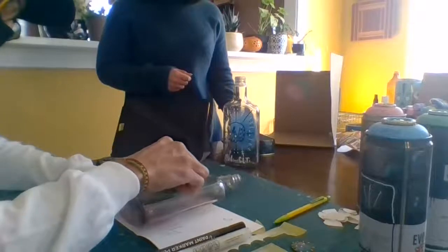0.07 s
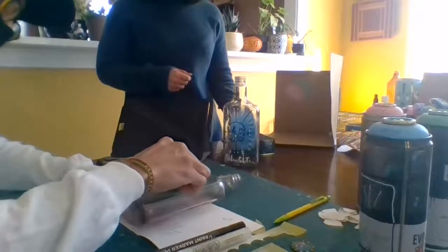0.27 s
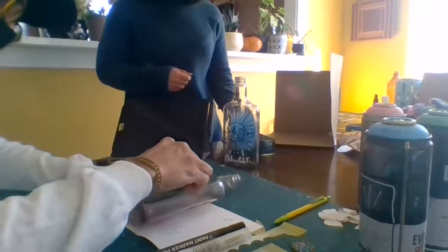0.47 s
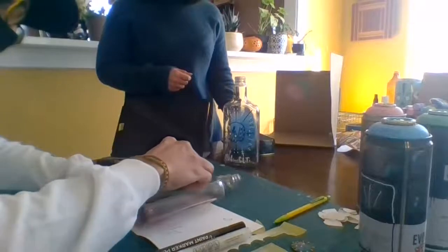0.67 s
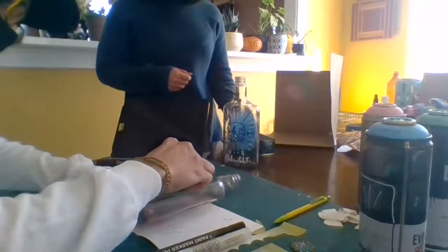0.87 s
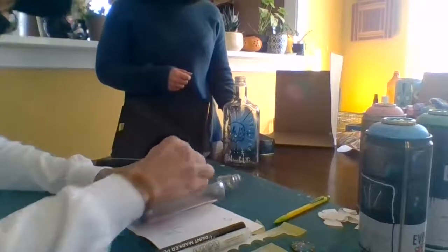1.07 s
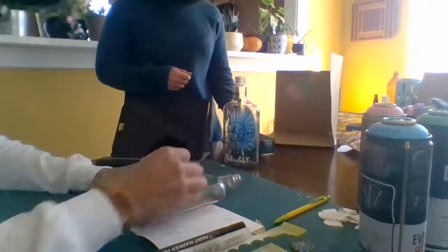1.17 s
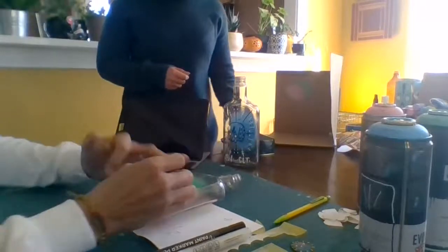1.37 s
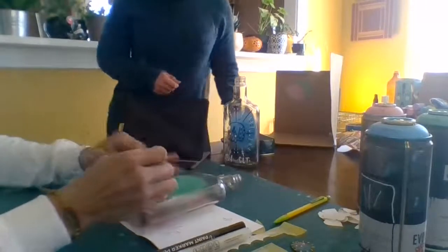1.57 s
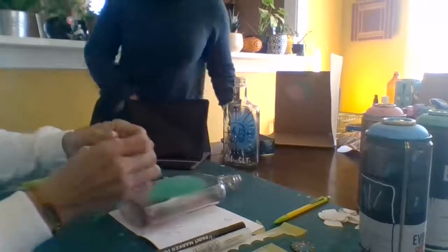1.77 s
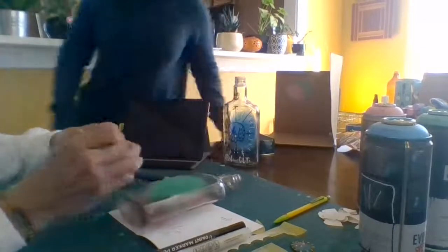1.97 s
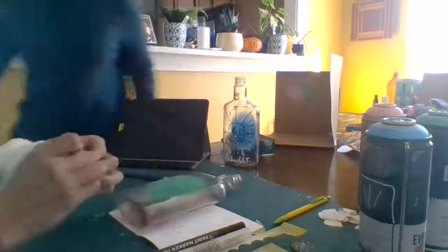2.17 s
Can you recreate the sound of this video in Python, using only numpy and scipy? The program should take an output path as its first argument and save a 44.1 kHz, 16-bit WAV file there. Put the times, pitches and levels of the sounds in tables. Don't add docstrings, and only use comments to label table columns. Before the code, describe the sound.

A razor blade scrapes a glass bottle twice, one gritty stroke then a sharper flick with a brief glassy ring, after soft table bumps and two light taps, close in a small room with faint hiss.

```python
import sys
import numpy as np
from scipy import signal
from scipy.fft import rfft, irfft
from scipy.io import wavfile
from scipy.ndimage import uniform_filter1d

SR = 44100
rng = np.random.default_rng(int(sys.argv[2]) if len(sys.argv) > 2 else 0)


def inscribe(sig):
    pcm = np.round(np.clip(np.atleast_2d(sig).T, -1, 1) * 32767)
    wavfile.write(sys.argv[1], SR, pcm.astype(np.int16))


def undo_db(level):
    steps = np.asarray(level, float) / 20
    return 10 ** steps


N = 98298


def level(x, db):
    return x * undo_db(db) / np.sqrt(np.mean(x ** 2))


def curve(rows):
    return undo_db(np.interp(np.arange(N) / SR, *np.array(rows).T, left=-200, right=-200))


def colour(x, points):
    f = np.arange(N // 2 + 1) * SR / N + 1
    hz, db = np.array(points).T
    gain_db = np.interp(np.log(f), np.log(hz), db, left=-90, right=-90)
    return irfft(rfft(x) * undo_db(gain_db), N)


def butter(x, order, hz, kind):
    return signal.sosfilt(signal.butter(order, hz, kind, fs=SR, output="sos"), x)


def mode(x, hz, t60):
    pole = np.exp(2j * np.pi * hz / SR - np.log(1000) / (t60 * SR))
    return signal.lfilter([1], [1, -pole], x).imag


def walk(rate):
    k = int(SR / rate)
    steps = np.repeat(rng.standard_normal(N // k + 1), k)
    return 1.5 * uniform_filter1d(uniform_filter1d(steps, k), k)[:N]


# time in seconds [s], level [dB].
FIRST_STROKE = [
    (1.432, -67),
    (1.448, -51),
    (1.482, -39.5),
    (1.512, -43),
    (1.52, -35.5),
    (1.545, -38.5),
    (1.57, -33.5),
    (1.582, -55),
    (1.61, -54),
]
# time in seconds [s], level [dB].
SECOND_STROKE = [
    (1.794, -35.5),
    (1.798, -33.5),
    (1.808, -31.5),
    (1.817, -29),
    (1.824, -32),
    (1.833, -32),
    (1.86, -80),
]
# pitch [Hz], t60 [s], first stroke level [dB],
# place along the stroke where it rings best [0-1], second stroke level [dB].
GLASS_MODES = [(2024, 0.22, -4.5, 0.52, -28), (2126, 0.087, -8, 0.42, -22), (3388, 0.039, -11, 0.28, -9),
               (3640, 0.16, -7.5, 0.78, -24), (3520, 0.087, -9.5, 0.77, -12.5), (4590, 0.21, -1, 0.09, -16),
               (4580, 0.11, -33, 0.1, -10), (4790, 0.059, -4.5, 0.91, -11), (5525, 0.076, -11, 0.42, -6.5),
               (5780, 0.055, -7, 0.8, -32), (6210, 0.11, -3.5, 0.52, -6.5), (6370, 0.058, -3.5, 0.1, -7.5)]
# pitch [Hz], t60 [s], first stroke level [dB],
# place along the stroke where it rings best [0-1], second stroke level [dB].
STEEL_MODES = [(8200, 0.02, -6, 0.5, -21), (8400, 0.14, -8, 0, -15), (8720, 0.027, 0.5, 0.29, -17),
               (8967, 0.066, -1.5, 0.8, 2), (9420, 0.18, 0.5, 0.15, -7), (9290, 0.053, 0, 0.33, -10),
               (9890, 0.088, 0, 0.24, -11.5), (10250, 0.049, -28, 0.1, -28), (10800, 0.042, -8.5, 0.35, -9),
               (10980, 0.06, -11, 0.6, -11), (11700, 0.018, -18, 0.2, -21)]
# frequency [Hz], density [dB per Hz].
PAINT_RASP = [(300, -22), (700, -31.5), (1300, -12.5), (2500, -15), (4500, -7.5), (7000, -7), (9500, -5),
              (12000, -14)]


def slip_grains(press):
    grains_per_s, spread_db = 7000, 0.5
    happens, size, sign = rng.random((3, N))
    heights = undo_db(np.minimum(-spread_db * np.log(size), 9))
    slips = (happens < grains_per_s / SR) * heights * np.sign(sign - .5)
    return level(slips, 0) * curve(press) * undo_db(1.9 * walk(150))


def stroke(press, mode_db, places, ring, focus_db, flutter_db, rasp_db, rasp_tilt_db_oct, rasp_wet_db):
    slips = slip_grains(press)
    start, end = press[0][0], press[-1][0]
    along = np.clip((np.arange(N) / SR - start) / (end - start), 0, 1)
    tilted = [(f, d + rasp_tilt_db_oct * np.log2(f / 9500)) for f, d in PAINT_RASP]
    rasp = undo_db(rasp_db) * colour(slips, tilted)
    focuses = [focus_db[0]] * len(GLASS_MODES) + [focus_db[1]] * len(STEEL_MODES)
    ringing = np.zeros(N)
    for row, db, place, focus in zip(list(GLASS_MODES) + list(STEEL_MODES), mode_db, places, focuses):
        hz, t60 = row[:2]
        t60 = t60 * ring[int(hz > 5000)]
        push = slips * np.sign(rng.standard_normal(N)) * undo_db(-focus * (along - place) ** 2)
        voice = undo_db(flutter_db * walk(130)) * mode(push, hz, t60)
        ringing += level(voice, db) * np.std(push) / 2
    ringing = butter(ringing, 4, 1800, "high")
    return np.array([ringing + rasp, undo_db(-11) * ringing, undo_db(rasp_wet_db) * rasp])


def strokes():
    _, _, first_db, places, second_db = np.array(list(GLASS_MODES) + list(STEEL_MODES)).T
    first = stroke(FIRST_STROKE, first_db, places, ring=(.65, .75), focus_db=(150, 40), flutter_db=2.4,
                   rasp_db=-2, rasp_tilt_db_oct=1.8, rasp_wet_db=7)
    flick_places = np.full(len(places), .42)
    second = stroke(SECOND_STROKE, second_db, flick_places, ring=(1.0, .8), focus_db=(120, 10),
                    flutter_db=1.6, rasp_db=-17.5, rasp_tilt_db_oct=3.5, rasp_wet_db=14.5)
    return first + second


# start in seconds [s], peak level [dB], pitch [Hz], t60 [s], beats per second [1/s].
FREE_PAIRS = [
    (1.828, -44, 3636, .52, 9.2),
    (1.832, -48, 4667, .33, 16),
    (1.83, -59, 2073, .3, 22),
    (1.83, -46, 6205, .17, 30),
    (1.83, -54, 11200, .2, 25),
]


def after_ring():
    lift_s, beat_depth, grip_s, grip_db_per_s = .012, .45, 1.955, 260
    out = np.zeros(N)
    for start, db, hz, t60, beat in FREE_PAIRS:
        t = np.maximum(np.arange(N) / SR - start, 0)
        beats = (1 + beat_depth * np.cos(2 * np.pi * beat * (t - lift_s))) / 2
        gripped_db = grip_db_per_s * np.maximum(t + start - grip_s, 0)
        fade = undo_db(db - 60 * t / t60 - gripped_db + 2 * walk(90))
        swell = 1 - np.exp(-(t / lift_s) ** 2)
        out += fade * swell * beats * np.sin(2 * np.pi * hz * t)
    return out


# start in seconds [s], level [dB], tilt [dB per octave], spot on the wall [0 or 1].
GLASS_TAPS = [
    (.742, -56, 5, 0),
    (.748, -48, 1.5, 0),
    (1.1765, -44.5, 0.5, 1),
    (1.187, -54.5, 9, 1),
    (1.807, -54.5, 11, 1),
]
# pitch [Hz], level at spot 0 [dB], level at spot 1 [dB], t60 [s].
TAPPED_MODES = [(1855, -19.5, -25, .2), (2034, 2.5, 2.5, 0.11), (2150, -6.5, -8.5, 0.12),
                (2400, -25, -20, 0.07), (3318, -4.5, -6, 0.057), (3357, -17, -17.5, 0.059),
                (3720, -20, -23.5, 0.08), (4590, -45, -22, 0.07), (4610, -42, -15.5, 0.076)]


def taps():
    out = np.zeros(N)
    for hz, *spot_db, t60 in TAPPED_MODES:
        push = np.zeros(N)
        for start, db, tilt, spot in GLASS_TAPS:
            push[int(start * SR)] = undo_db(db + spot_db[int(spot > .5)] + tilt * np.log2(hz / 2000))
        contact = mode(push, hz, 0.0052) * np.log(1000) / (0.0037 * SR)
        out += undo_db(4.0 * walk(120) + 1) * mode(contact, hz, t60)
    return knock_sends(out)


def tick():
    start_s, peak_db, t60_s, band_hz = .3065, -46.5, 0.011, [2000, 5310 - 20 + 0]
    t = np.arange(N) / SR
    fade = (t >= start_s) * undo_db(peak_db - 60 * np.abs(t - start_s) / t60_s)
    burst = fade * np.sign(rng.standard_normal(N))
    return knock_sends(2 * butter(burst, 2, band_hz, "band"))


def knock_sends(x):
    x = butter(x, 4, 1750, "high")
    return np.array([x, undo_db(-9) * x, 0 * x])


# start in
# seconds [s], peak level [dB], pitch [Hz], t60 [s], swell [s].
TABLE_BUMPS = [(.25, -52.5, 127, 0.16, 0.0048), (0.277, -43.5, 135.6, 0.1, 0.01),
               (.742, -42.5, 294.6, 0.12, 0.003), (0.741, -46, 190, 0.15, 0.0037),
               (.755, -44.5, 356, 0.079, 0.0039), (0.791, -41.5, 126, 0.15, 0.0094),
               (0.909, -52.5, 202, 0.12, 0.0088), (1.044, -57.5, 149, 0.31, 0.0025),
               (1.1, -59, 165.7, 0.49, 0.0097), (1.165, -43, 205, 0.096, 0.011),
               (1.176, -45, 147, 0.077, 0.0056), (1.37, -53.5, 113.5, 0.15, 0.004),
               (1.59, -42.5, 149.5, 0.067, 0.0067), (1.731, -55, 200.2, 0.22, 0.0057),
               (1.815, -55.5, 166.3, 0.3, 0.0098), (2.141, -56, 1133, 0.07, 0.0036),
               (.94, -56.5, 1851, 0.086, 0.011), (1.232, -63, 2070, .07, 0.012),
               (1.236, -62.5, 2150, 0.062, .01)]


def bumps():
    out = np.zeros(N)
    for start, db, hz, t60, swell in TABLE_BUMPS:
        t = np.maximum(np.arange(N) / SR - start, 0)
        envelope = undo_db(db - 60 * t / t60) * (1 - np.exp(-(t / swell) ** 2))
        out += envelope * np.sin(2 * np.pi * (hz * t + rng.random()))
    return out


# middle in
# seconds [s], length [s], level [dB], pitch [Hz], width [Hz].
SOFT_RUSTLES = [(.16, 0.036, -76.5, 650, 210), (0.28, 0.039, -83.5, 1200, 180),
                (0.326, 0.018, -77, 2400, 320), (0.333, 0.03, -83, 3000, 310),
                (0.323, 0.018, -72.5, 3840, 840), (0.476, 0.041, -75.5, 730, 360),
                (0.49, 0.056, -83, 1380, 190), (0.497, 0.035, -77, 1870, 180),
                (0.796, 0.039, -77, 1300, 530), (0.778, 0.07, -73.5, 7500, 6300),
                (1.31, 0.04, -72.5, 848, 66), (1.29, 0.043, -80.5, 1250, 500),
                (1.493, 0.048, -70.5, 696, 195), (1.465, 0.03, -69, 1360, 460),
                (1.585, 0.023, -77, 590, 150), (1.568, 0.088, -74, 1300, 310),
                (1.963, 0.14, -71.5, 586, 190), (0.764, 0.033, -72, 4600, 220),
                (0.79, 0.055, -80, 3660, 120), (1.225, 0.038, -82, 3480, 82), (1.7, .035, -78, 4680, 140),
                (2.05, 0.025, -75.5, 3330, 890), (2.155, 0.03, -74, 1600, 550)]


def rustles():
    t, out = np.arange(N) / SR, np.zeros(N)
    for middle, length, db, hz, width_hz in SOFT_RUSTLES:
        band_hz = [max(hz - width_hz / 2, 100), hz + width_hz / 2]
        noise = level(butter(rng.standard_normal(N), 2, band_hz, "band"), db)
        out += np.exp(-((t - middle) / length) ** 2) * undo_db(2.0 * walk(60.18)) * noise
    return out


# time in seconds [s], level [dB].
PAPER_SLIDE = [(.42, -100), (.5, -81), (.56, -91), (.655, -94), (.685, -80), (.72, -89), (.9, -99),
               (.95, -79.5), (1.0, -80.5), (1.08, -86), (1.13, -95), (1.25, -86), (1.305, -79),
               (1.36, -100)]


def slide():
    pitch_hz, width_hz = 1868, 54
    return curve(PAPER_SLIDE) * level(mode(rng.standard_normal(N), pitch_hz, 5.2 / width_hz), 0)


def room(x, t60):
    gap_s, top_hz, room_db = 0.0025, 10100, -4.5
    t = np.arange(int(.7 * SR)) / SR
    tail = rng.standard_normal(len(t)) * undo_db(-60 * t / t60) * (t > gap_s)
    tail = signal.lfilter(*signal.butter(1, top_hz, fs=SR), tail)
    return undo_db(room_db) * signal.fftconvolve(x, tail / np.sqrt(np.sum(tail ** 2)))[:N]


# frequency [Hz], density [dB per Hz].
HOUSE_RUMBLE = [(18, -73), (30, -38.5), (124, 3), (267, -3.5), (380, -13), (641, -17), (1660, -25),
                (1860, -26.5), (2600, -39), (3380, -62), (5720, -120)]
# time in seconds [s], level [dB].
PEOPLE_STIR = [
    (0, -70),
    (.5, -70.5),
    (.9, -65.5),
    (1.3, -68),
    (1.7, -65),
    (2.0, -67.5),
    (2.23, -70),
]


def rumble():
    low = level(colour(rng.standard_normal(N), HOUSE_RUMBLE), 0)
    bass = signal.sosfiltfilt(signal.butter(2, 420, fs=SR, output="sos"), low)
    flicker = bass * undo_db(0.7 * walk(15.4)) + (low - bass) * undo_db(1.07 * walk(3.76))
    return curve(PEOPLE_STIR) * flicker


# frequency [Hz], density [dB per Hz].
MIC_HISS = [(2000, -14), (2430, -18.5), (3460, -12), (4500, -1.5), (7610, -1.5), (9330, 5.5), (10800, 1),
            (12000, -10), (15500, -24), (15800, -60), (22000, -120)]
# time in seconds [s], gain [dB].
HISS_GATE = [
    (0, 0.5),
    (.72, 0.3),
    (.78, 2.5),
    (1.4, 3),
    (1.7, 14),
    (2.0, 11),
    (2.23, 5.5),
]


def hiss():
    return curve(HISS_GATE) * level(colour(rng.standard_normal(N), MIC_HISS), -78)


def scene():
    near, ringing, rasp = strokes() + taps() + tick()
    echoes = room(ringing, .22) + room(rasp, 0.44)
    handling = after_ring() + bumps() + rustles() + slide()
    return (near + echoes + handling + rumble() + hiss())[None]


def low_pass(x):
    return signal.sosfilt(signal.butter(12, 15700, fs=SR, output="sos"), x)


def record(dry):
    low = signal.sosfiltfilt(signal.ellip(8, .1, 40, 12000, fs=SR, output="sos"), dry)
    mix = low + undo_db(-22) * (dry - low)
    return low_pass(mix)


dry = scene()
out = record(dry)
inscribe(out)
```